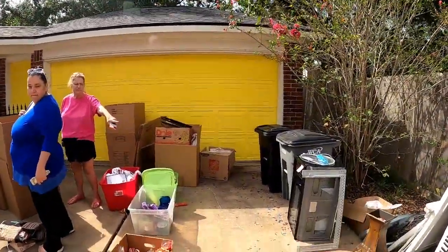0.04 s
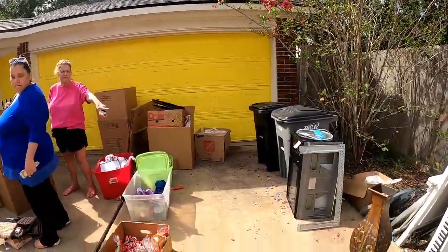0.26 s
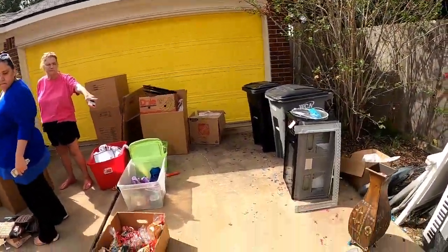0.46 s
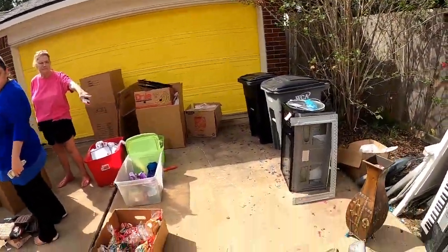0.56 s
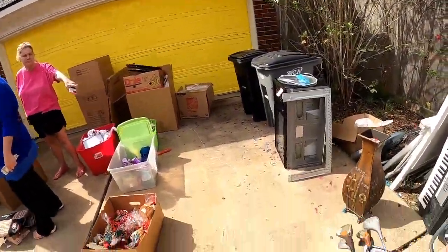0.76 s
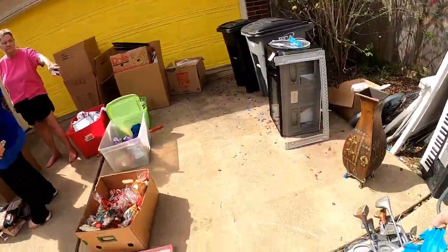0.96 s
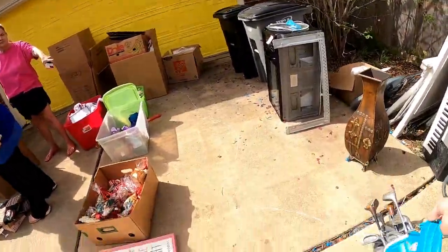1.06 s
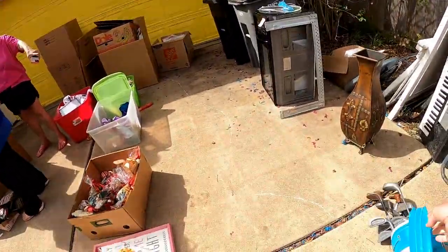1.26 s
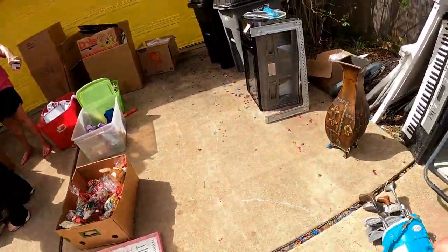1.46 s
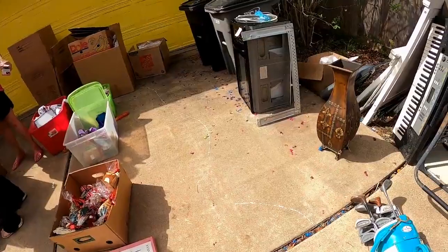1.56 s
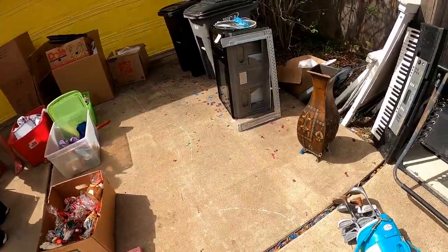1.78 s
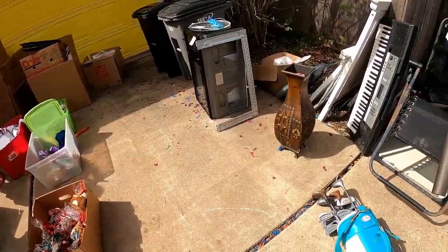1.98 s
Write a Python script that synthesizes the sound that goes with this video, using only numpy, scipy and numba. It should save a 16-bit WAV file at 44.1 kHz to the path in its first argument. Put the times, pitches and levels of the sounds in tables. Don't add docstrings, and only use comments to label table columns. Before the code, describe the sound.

Close and slightly right, a padded golf bag shakes and lands on a driveway, its metal clubs knocking and chattering, after a gritty footstep; quiet yard with distant traffic and insect rasps, handheld stereo microphone.

```python
import sys
import numpy as np
from scipy import signal
from scipy.fft import rfft, irfft
from scipy.io import wavfile
from scipy.ndimage import uniform_filter1d
from numba import njit

SR = 44100
rng = np.random.default_rng(int(sys.argv[2]) if len(sys.argv) > 2 else 0)


def int16_out(signal):
    q = np.round(np.clip(np.atleast_2d(signal).T, -1, 1) * 32767)
    wavfile.write(sys.argv[1], SR, q.astype(np.int16))


def ratio(d):
    e = np.asarray(d, float) / 20
    return 10 ** e


N = 89214
T = np.arange(N) / SR

# time in seconds, shaking of the tube in dB, jostle of the shafts in dB.
MOTION = [(.705, -88, -83), (.72, -52.5, -49.5), (.79, -41, -52), (.9, -31.5, -42), (1.06, -26, -36.5),
          (1.14, -30, -40.5), (1.217, -34, -37), (1.225, -21.5, -25), (1.28, -21.5, -31),
          (1.30, -28.5, -30.5), (1.46, -36, -42.5), (1.51, -34.5, -38), (1.54, -33, -45.5),
          (1.576, -28, -38.5), (1.61, -38.5, -47), (1.7, -52, -65.5), (1.76, -60, -99)]
# time in seconds, level in dB.
WEIGHT = [(.7, -11), (.82, -4.5), (.95, -4), (1.06, 0.5), (1.2, -1), (1.3, -0.5), (1.5, 1), (1.62, 3),
          (1.76, 3)]
# time in seconds, peak in dB, pitch in Hz, time to fade by 60 dB in seconds.
THUMPS = [(.104, -37, 380, 0.035), (.147, -36, 409, 0.08), (0.1737, -18, 423, 0.0099),
          (0.72, -23.5, 490, 0.014), (0.7621, -24.5, 504, 0.017), (0.83, -27.5, 174, 0.077),
          (0.904, -19, 670, 0.016), (0.959, -14, 189, 0.052), (.986, -11.5, 332, 0.016),
          (1.016, -14, 381, 0.042), (1.0495, -11, 281, .03), (1.054, -19, 139, 0.27),
          (1.098, -23.5, 404, 0.04), (1.175, -31, 350, .08), (1.221, -16.5, 540, 0.017),
          (1.227, -17.5, 1033, 0.12), (1.241, -10, 263, 0.049), (1.244, -9, 129.6, 0.094),
          (1.2574, -6, 297.5, 0.11), (1.276, -11, 287, 0.024), (1.328, -12, 260, 0.03),
          (1.55, -27, 341, 0.064), (1.5675, -17, 520, .014), (1.5705, -20, 110, .09),
          (1.5715, -17, 300, .02), (1.86, -37, 126.3, 0.028)]
# pitch in Hz, level in dB.
TUBE_TONES = [(95, -9), (133, -5.5), (160, -6.5), (200, -7), (240, -3.5), (288, 1), (340, -1), (405, -1.5),
              (480, -0.5), (550, -4), (700, -3)]
# time in seconds, peak in dB, pitch in Hz.
KNOCKS = [(.788, -32, 530), (.812, -35, 480), (.921, -27, 650), (.948, -27, 900), (0.801, -36, 420),
          (.831, -31, 530), (.862, -30, 446), (0.882, -19.5, 480), (.886, -35, 1410), (.893, -26, 298),
          (0.911, -29.5, 1140), (.941, -24, 570), (.957, -13.5, 430), (0.972, -19, 229),
          (1.029, -23.5, 460), (1.04, -12.5, 450), (1.069, -22, 1070), (1.083, -18, 230), (1.1, -30, 1060),
          (1.117, -29, 1300), (1.127, -24.5, 510), (1.15, -23, 480), (1.151, -25, 1440),
          (1.196, -25.5, 1370), (1.236, -4.5, 1046), (1.261, -19.5, 2750), (1.273, -22.5, 1500),
          (1.279, -26, 660), (1.285, -11.5, 343), (1.331, -15, 2456), (1.404, -31, 555),
          (1.471, -25.5, 295), (1.482, -25, 590), (1.5705, -19, 730), (1.556, -26, 400), (1.585, -21, 220),
          (.184, -25, 1090), (0.2033, -30, 1800), (.209, -29, 1740), (.227, -44, 3270), (0.239, -38, 200),
          (0.664, -51, 2800)]
# time in seconds, peak in dB, ring in Hz, crack in
# dB.
CLACKS = [(.0054, -31.5, 1120, -62), (.018, -33, 3310, -47.5), (.126, -43, 2050, -47),
          (0.1734, -34, 1480, -37.5), (0.1966, -20.5, 1970, -36), (.315, -52, 1763, -60),
          (.4845, -56, 4700, -70), (.416, -56, 3300, -60), (0.483, -36.5, 1280, -50),
          (0.7193, -30, 1330, -42.5), (0.7412, -44, 3170, -44), (.7961, -50, 4150, -45),
          (0.8542, -27, 2750, -52), (.8535, -31, 4300, -60), (.854, -36, 5200, -60),
          (0.876, -33, 2730, -56), (0.906, -23.5, 1060, -43.5), (0.9306, -28, 1600, -37.5),
          (1.04, -25, 1460, -37.5), (1.2205, -20.5, 4350, -31.5), (1.2261, -13, 2420, -26.5),
          (1.2467, -7.5, 4290, -38.5), (1.2512, -10.5, 3630, -20.5), (1.3264, -20, 1700, -26),
          (1.3704, -18, 3800, -34), (1.4354, -26.5, 3570, -51), (1.4669, -38, 4830, -31.5),
          (1.495, -15, 3780, -36), (1.5047, -34, 9060, -30), (1.5666, -29.5, 2800, -34),
          (1.596, -32.5, 4100, -68),
          (.9405, -37, 4800, -39),
    (1.63, -47, 2710, -54),
    (1.715, -45.5, 9300, -72),
    (1.8449, -57, 2800, -58),
    (1.4, -56, 4800, -64),
    (1.531, -33, 3950, -50),
    (1.303, -24, 5100, -45),
    (1.258, -21, 6000, -35),
]
# pitch in Hz, level in dB.
CRACK_COLOUR = [(300, -7), (1500, 15.5), (4500, 2), (8000, 1), (11000, -8.5), (15000, -32.5)]
# time in seconds, level in dB.
CHATTER = [(.705, -81), (.72, -61), (.78, -64.5), (.93, -50.5), (1.217, -49), (1.224, -31), (1.25, -25.5),
           (1.27, -29.5), (1.36, -37), (1.455, -47), (1.5, -38), (1.56, -52), (1.6, -52.5), (1.66, -65),
           (1.73, -76.5), (1.76, -89)]
# pitch in Hz, level in dB.
SHAFT_PITCHES = [(450, -5.5), (750, -15), (1050, -1), (1500, -2), (2200, -15)]
# pitch in Hz, level in dB.
HEAD_PITCHES = [(2000, -10.5), (2600, 1), (3150, -4), (3900, 4), (4500, 0), (5600, -4), (7500, -10),
                (14000, -24)]
# start, attack, hold and 60 dB fade, all in seconds, then level in dB.
SCUFFS = [
    (0.1743, 0.016, 0.0051, 0.094, -35),
    (0, 0.0017, 0.0053, 0.61, -47),
]
# start, attack, hold and 60 dB fade in seconds, level in dB.
SLIDE = [
    (.19, 0.01, 0.013, .12, -43.5),
]
# pitch in Hz, level in dB.
GRIT_PITCHES = [(250, -4.5), (550, -2), (1100, -1.5), (2000, 1), (3400, -0.5), (6000, 1), (12000, -34)]
# pitch in Hz, level in dB.
FINE_GRIT_PITCHES = [(1500, -1), (2200, -10.5), (3300, 7), (4800, -3), (8000, -17)]
# pitch in Hz, level in dB.
YARD_COLOUR = [(30, -1.5), (97, -6), (256, -21), (700, -32), (1600, -36), (2500, -48), (4000, -46),
               (6500, -51.5), (8300, -53.5), (9500, -72)]
# pitch in Hz, level under the shared sound in dB.
YARD_SIDE = [(60, -24), (300, -11), (1400, -5), (7000, -2)]
# start, length and fade in seconds, low edge in Hz, width in octaves,
# level in dB.
RASPS = [
    (0.026, 0.13, 0.074, 4550, 0.25, -69.5),
    (0.324, 0.2, 0.035, 4560, 0.29, -69),
    (.58, 0.069, 0.055, 4750, 0.32, -74),
    (-0.21, .7, .9, 1750, .36, -69.5),
    (0.016, 0.076, .1, 7200, 0.23, -74),
    (1.6, .06, .02, 5540, 0.046, -66),
    (0.79, 0.075, .05, 5070, 0.64, -55.5),
    (1.709, 0.074, 0.18, 7150, 0.17, -72),
]
# pitch in Hz, level in dB.
MIC_COLOUR = [(25, -24), (50, 0), (90, 1.5), (9000, 1.5), (15000, -6), (15700, -12), (16000, -60)]


def tube():
    rows = np.array(THUMPS)
    thumps, at, size = struck(rows, rows[:, 3])
    thumps = thumps + ratio(-18.5) * body(at, size, push_s=0.0013)

    chance = rng.random((600, 2))
    knock_at = (chance[:, 0] * (N - 1)).astype(int)
    knock_size = ratio(-3.2 * np.log(1 - chance[:, 1]))
    rumble = body(knock_at, knock_size, push_s=0.0012)
    rumble = rumble / np.sqrt(uniform_filter1d(rumble ** 2, size=2500))

    deep_hz = 260
    deep = colour(rumble, [(deep_hz * .8, 0), (deep_hz * 1.25, -40)])
    weighted = rumble + (drive(WEIGHT, 1) - 1) * deep
    return thumps + drive(MOTION, 1) * weighted


def body(at, size, push_s):
    push = np.hanning(int(push_s * SR) + 3)
    push = push / push.sum()
    mix = rng.standard_normal((len(at), len(TUBE_TONES)))
    out = np.zeros(N)
    for k, (hz, db) in enumerate(TUBE_TONES):
        hits = np.bincount(at, size * mix[:, k], N)
        pushes = np.convolve(hits, push)[:N]
        out += ratio(db) * ring(pushes, hz, 29.3 / hz)
    return out


def knocks():
    rows = np.array(KNOCKS)
    return struck(rows, 5.7 / rows[:, 2] + 0.0037)[0]


def clubs():
    rows = np.array(CLACKS)
    tones, at, _ = struck(rows, 0.0087)

    crack_s = 0.0034
    hits = np.bincount(at, ratio(rows[:, 3]), N)
    burst = signal.lfilter([1], [1, -np.exp(-1 / (crack_s * SR))], hits)
    cracks = burst * level(colour(rng.standard_normal(N), CRACK_COLOUR), 0)

    span_s = (.7, 1.76)
    jostle = rattle(drive(MOTION, 2), span_s, SHAFT_PITCHES, count=4500, spread_db=1.0, cycles=3.0)
    chatter = rattle(drive(CHATTER, 1), span_s, HEAD_PITCHES, count=6000, spread_db=3.5, cycles=7.)
    return tones + cracks + jostle + chatter


def shoe():
    span_s = (0, .3)
    crunch = rattle(pressure(SCUFFS), span_s, GRIT_PITCHES, count=2500, spread_db=2.0, cycles=2.8)
    slide = rattle(pressure(SLIDE), span_s, FINE_GRIT_PITCHES, count=2000, spread_db=2.5, cycles=3.4)
    return crunch + slide


def pressure(rows):
    out = np.zeros(N)
    for start, attack, hold, t60, db in rows:
        fade_db = -60 * np.clip(T - start - attack - hold, 0, 9) / t60
        out += ratio(db + fade_db) * np.clip((T - start) / attack, 0, 1) ** .5
    return out


def yard():
    mid = level(colour(rng.standard_normal(N), YARD_COLOUR), -51)
    side = level(colour(rng.standard_normal(N), YARD_COLOUR), -51)
    traffic = mid + colour(side, YARD_SIDE) * np.array([[1], [-1]])
    traffic = traffic * ratio(-3 * (T - 1.96))
    treble = signal.sosfilt(signal.butter(2, 1718, "high", fs=SR, output="sos"), traffic)
    out = traffic + (ratio(-3 * T) - 1) * treble
    for row in RASPS:
        out = out + rasp(*row)
    hum_db = -65.5 - 5.5 * T
    return out + ratio(hum_db) * np.sin(2 * np.pi * 638 * T)


def rasp(start, length, fade, hz, octaves, db):
    top_hz = hz * 2 ** octaves
    band = [(hz * .85, -30), (hz, 0), (top_hz, -4), (top_hz * 1.2, -30)]
    rise = (T - start) / .03
    fall = 1 + (start + length - T) / fade
    swell = np.clip(np.minimum(rise, fall), 0, 1) ** 2
    return level(colour(rng.standard_normal((2, N)), band), db) * swell


def level(x, db):
    return x * ratio(db) / np.sqrt(np.mean(x ** 2))


def colour(x, points):
    p = np.array(points)
    hz = np.fft.rfftfreq(N, 1 / SR) + 1
    gain = ratio(np.interp(np.log(hz), np.log(p[:, 0]), p[:, 1]))
    return irfft(rfft(x) * gain, N)


def ring(x, hz, t60):
    pole = np.exp(2j * np.pi * hz / SR - np.log(1000) / (t60 * SR))
    return signal.lfilter([1], [1, -pole], x).imag


def drive(table, col):
    p = np.array(table)
    return ratio(np.interp(T, p[:, 0], p[:, col], left=-120, right=-120))


def struck(rows, t60):
    at = (rows[:, 0] * SR).astype(int)
    size, hz = ratio(rows[:, 1]), 1. * rows[:, 2]
    cycles = t60 * hz / np.log(1000)
    return grains(at, hz, size, cycles, 0 * hz, N), at, size


def rattle(gain, span, pitches, count, spread_db, cycles):
    when, pitch, force, life, place = rng.random((count, 5)).T
    p = np.array(pitches)
    at = ((span[0] + np.ptp(span) * when) * SR).astype(int)
    hz = p[0, 0] * (p[-1, 0] / p[0, 0]) ** pitch
    pitch_db = np.interp(np.log(hz), np.log(p[:, 0]), p[:, 1])
    size = ratio(pitch_db - spread_db * np.log(1 - .98 * force))
    long = cycles * 4 ** (life - .5)
    power = np.mean(size ** 2 * long / hz) / 4 * count / np.ptp(span)
    turn = np.pi * hz * 4e-5 * (2 * place - 1) * 2
    return grains(at, hz, size * gain[at] / np.sqrt(power), long, turn, N)


@njit
def grains(at, hz, size, cycles, turn, n):
    out = np.zeros((2, n))
    for k in range(len(at)):
        step = np.exp((2j * np.pi - 1 / cycles[k]) * hz[k] / SR)
        z = size[k] + 0j
        e = np.exp(1j * turn[k])
        for i in range(min(n - at[k], int(6 * cycles[k] * SR / hz[k]))):
            swell = min(1., 2 * i * hz[k] / SR)
            out[0, at[k] + i] += swell * (z * e).imag
            out[1, at[k] + i] += swell * (z / e).imag
            z *= step
    return out


def scene():
    near = tube() + knocks() + clubs() + shoe()

    lag_s, right_db = 5.5e-5, 2.5
    late = irfft(rfft(near) * np.exp(-2j * np.pi * np.fft.rfftfreq(N, 1 / SR) * lag_s), N)
    left = colour(late[0], [(300, -0.011), (5000, -right_db / 2)])
    right = colour(near[1], [(300, 0.011), (5000, right_db / 2)])
    direct = np.array([left, right])

    t = T[:8000]
    tail = rng.standard_normal((2, 8000)) * ratio(-60 * t / 0.087) * (t > .002)
    tail = tail / np.sqrt(np.sum(tail[0] ** 2))
    bright = signal.sosfilt(signal.butter(2, 815, "high", fs=SR, output="sos"), near)
    echo = ratio(-8) * signal.fftconvolve(bright, tail, axes=1)[:, :N]
    return direct + echo + yard()


def band_limit(x):
    return signal.sosfilt(signal.butter(12, 16020, fs=SR, output="sos"), x)


def record(dry):
    limit = 0.98
    rounded = limit * np.tanh(dry / limit)
    mix = colour(rounded, MIC_COLOUR)
    return band_limit(mix)


dry = scene()
out = record(dry)
int16_out(out)
```